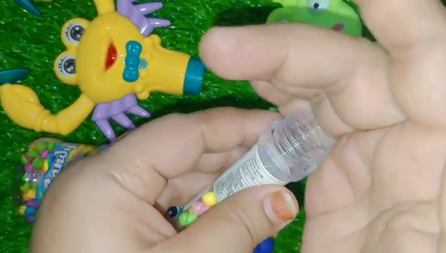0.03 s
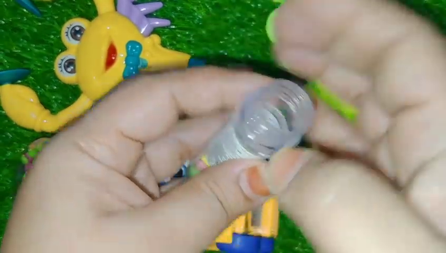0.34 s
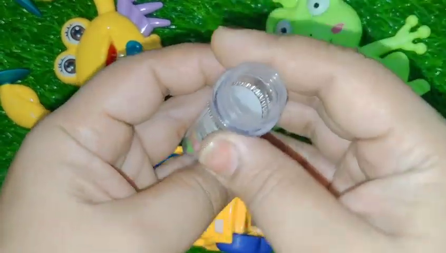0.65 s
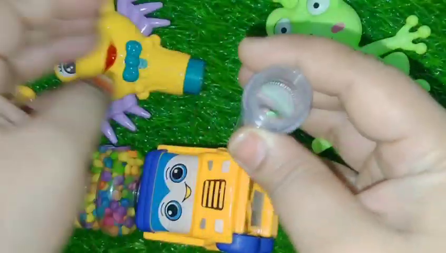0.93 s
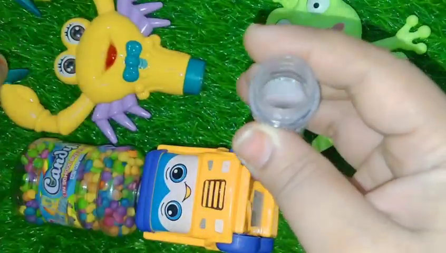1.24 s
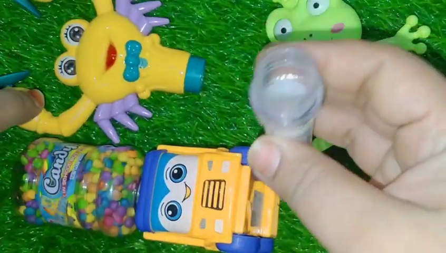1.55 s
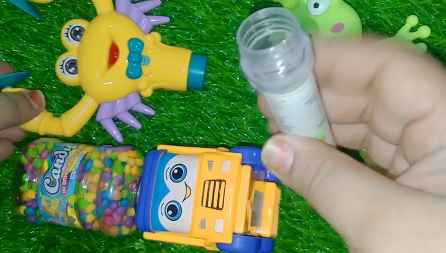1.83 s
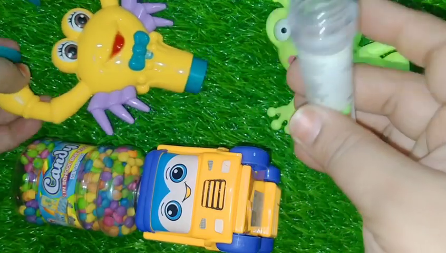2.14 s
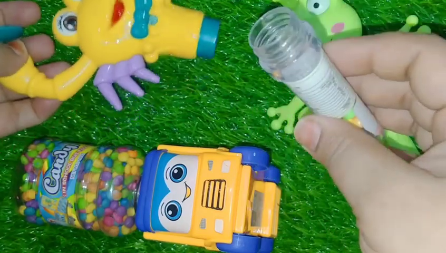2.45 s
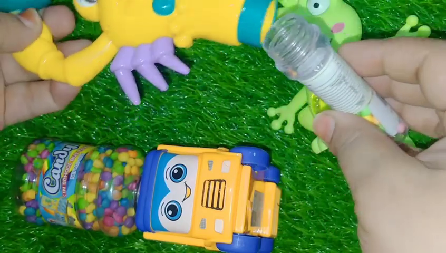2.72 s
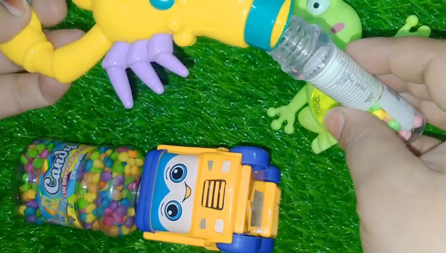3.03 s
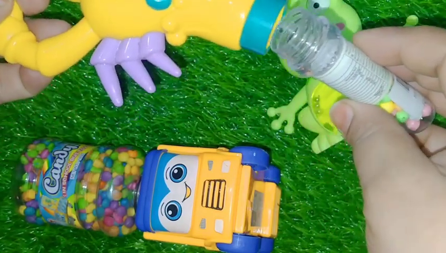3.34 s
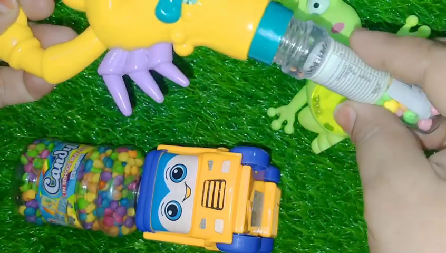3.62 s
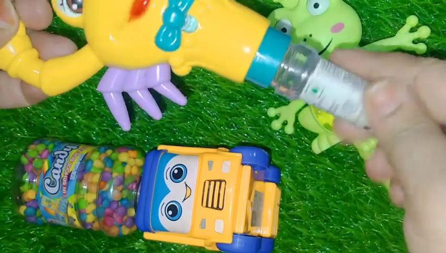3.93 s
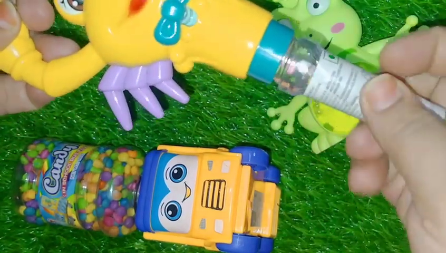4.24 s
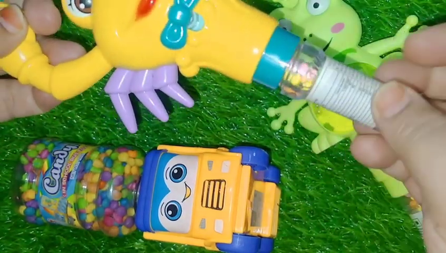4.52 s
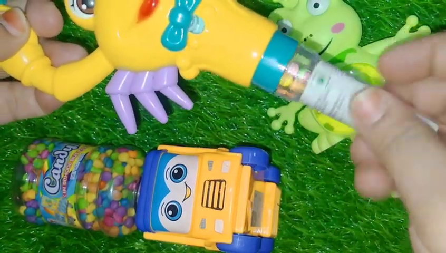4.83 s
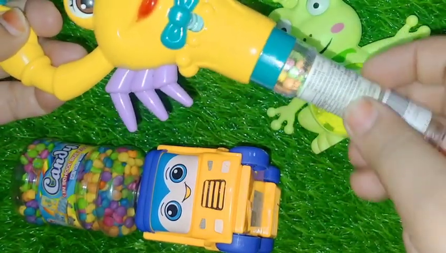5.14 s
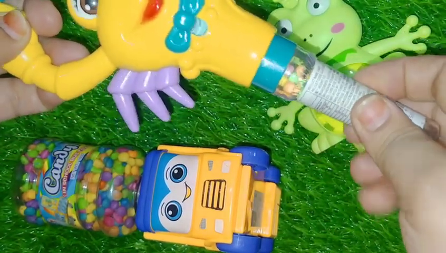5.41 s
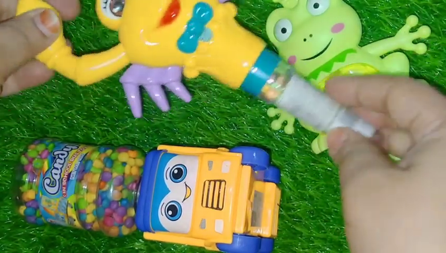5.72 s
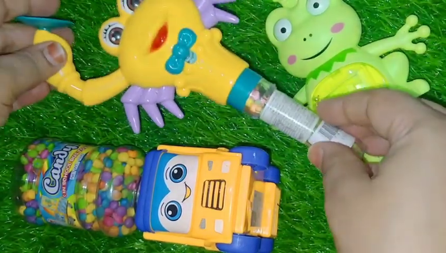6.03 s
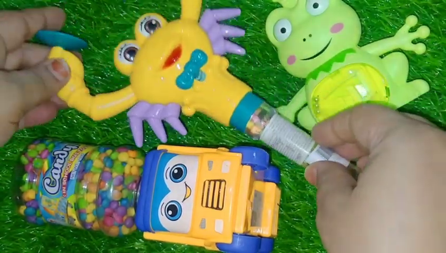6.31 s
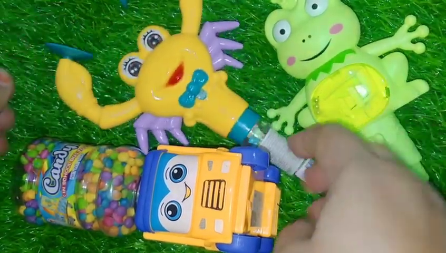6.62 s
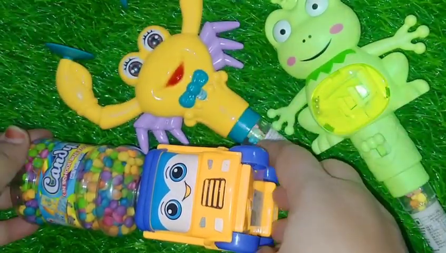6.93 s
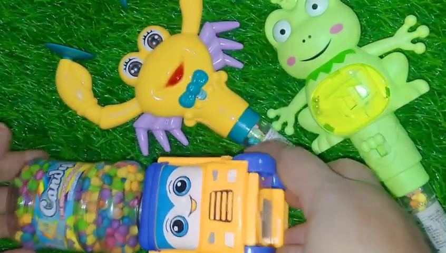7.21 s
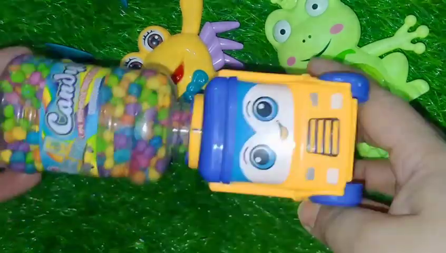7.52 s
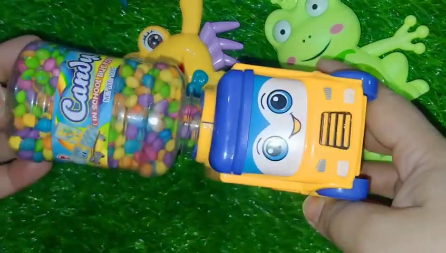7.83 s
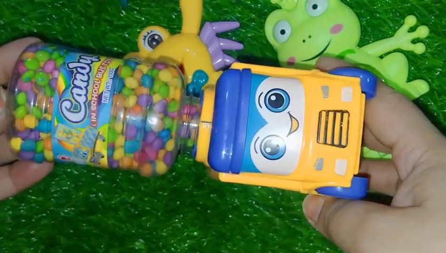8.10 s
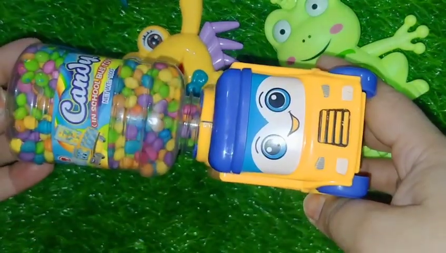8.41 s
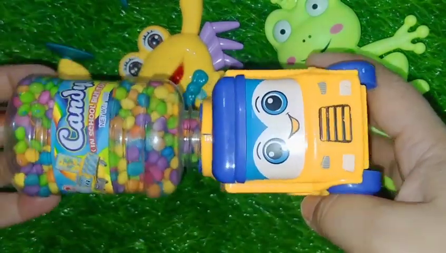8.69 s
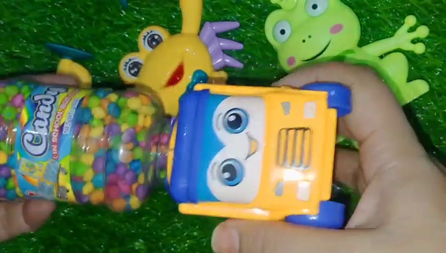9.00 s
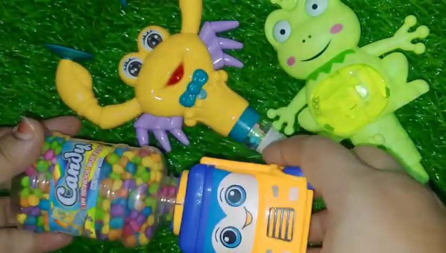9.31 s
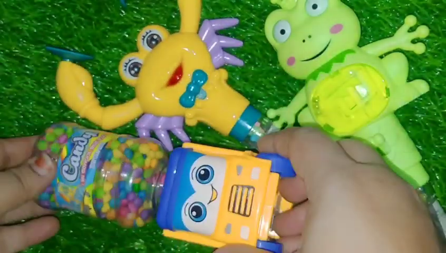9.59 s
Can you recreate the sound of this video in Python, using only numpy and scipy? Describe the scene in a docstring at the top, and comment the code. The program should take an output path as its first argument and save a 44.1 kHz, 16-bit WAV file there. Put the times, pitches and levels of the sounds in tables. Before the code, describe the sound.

Small hard candies rattle in a plastic tube and trickle into a hollow toy, with light plastic knocks and clicks close by.

```python
"""Small hard candies tick in a plastic tube, then run into a hollow toy crab, whose air space and neck ring.
Each tick is a flurry of tiny contacts, coloured by the plastic it strikes. The crab is knocked and
put down; a toy truck with a bottle of candies snaps under the fingers and is set down too.
Each load hops and settles. Fingers rub, an arm sweeps past; all is close, in a bare, ringing room
with a fan turning."""
import sys
import numpy as np
from scipy import signal
from scipy.fft import rfft, irfft
from scipy.io import wavfile
from scipy.ndimage import uniform_filter1d

SR = 44100
rng = np.random.default_rng(int(sys.argv[2]) if len(sys.argv) > 2 else 0)


def dump_mix(stems):
    """Bounce the given channels to the path in sys.argv[1] as a 16-bit WAV at rate SR."""
    frames = np.atleast_2d(stems).T  # one column per channel
    limited = np.clip(frames, -1, 1)  # hard clip at full scale
    pcm = np.round(limited * 32767).astype(np.int16)
    wavfile.write(sys.argv[1], SR, pcm)


N = 429975
LEAD_S = .003  # silence ahead of each flurry


def amp(db):
    """Decibels to gain."""
    return 10 ** (np.asarray(db) / 20)


def unit_rms(x):
    """Scales to rms 1."""
    return x / np.sqrt(np.mean(x ** 2) + 1e-20)


def at_level(x, db, size=176):
    """Scales the loudest 4 ms to db rms."""
    return x * amp(db) / np.sqrt(uniform_filter1d(x ** 2, size, mode="constant").max() + 1e-20)


def log_interp(points, hz):
    """Interpolates over log frequency."""
    f, value = np.transpose(points)
    return np.interp(np.log(hz + 1), np.log(f), value)


def bandpass(x, low_hz, high_hz):
    """Butterworth band-pass."""
    return signal.sosfilt(signal.butter(2, [low_hz, high_hz], "band", fs=SR, output="sos"), x)


def add(mix, s, sound):
    """Mixes a sound in at time s."""
    part = mix[max(round(s * SR), 0):][:len(sound)]
    part += sound[:len(part)]


def drift(max_hz, size=8192):
    """Slow noise, rms 1."""
    passband = np.fft.rfftfreq(size, N / SR / size) < max_hz
    slow = irfft(rfft(rng.standard_normal(size)) * passband)
    return np.interp(np.arange(N), np.linspace(0, N, size), unit_rms(slow))


def envelope(length_s, attack_s, release_s):
    """Trapezoid; the release starts at length_s."""
    t = np.arange(0, length_s + release_s, 1 / SR)
    return np.clip(np.minimum(t / attack_s, (length_s + release_s - t) / release_s), 0, 1)


def body(colour, peaks=(), size=4096):
    """Minimum-phase response, energy 1: resonances on a broad colour."""
    hz = abs(np.fft.fftfreq(size, 1 / SR))
    lift = 1 + sum(amp(db) / (1 + (2 * (hz - f) / width) ** 2) for f, width, db in peaks)
    log_gain = np.log(amp(log_interp(colour, hz)) * lift)
    response = np.fft.ifft(np.exp(np.conj(signal.hilbert(log_gain)))).real[:size // 2]
    return response / np.linalg.norm(response)


def ring(modes, size=4096):
    """Damped modes after one blow; neighbours swing in opposite directions."""
    t = np.arange(size) / SR
    grip_detune = 1 + .012 * rng.standard_normal(len(modes))
    return sum((-1) ** k * amp(db) * 10 ** (-3 * t / t60) * np.sin(2 * np.pi * hz * grip_detune[k] * t)
               for k, (hz, db, t60) in enumerate(modes))


def flurry(decay_ms, spike_db=3, size=2048):
    """One impact as many tiny, unequal contacts, whitened to excite all pitches alike."""
    age = np.maximum(np.arange(size) / SR - LEAD_S, 0) / (max(decay_ms, .4) / 1000)
    contacts, heights = rng.standard_normal((2, size))
    spiky = contacts * amp(spike_db * np.clip(heights, -2, 2))
    spectrum = rfft(spiky * (1 - np.exp(-1.3 * age)) * np.exp(-age))
    return irfft(spectrum / np.sqrt(abs(spectrum) + 1e-12), size)


def crack(decay_ms, db, low_hz=800, high_hz=3600):
    """Two plastic parts meet: a short, dull flurry."""
    return at_level(bandpass(flurry(decay_ms), low_hz, high_hz), db)


def strike(s, db, max_touch_s=.006, max_rebound_s=.016):
    """Light touch, blow and rebound, unevenly spaced: (time [s], level [dB])."""
    before, after = rng.uniform(.4, 1, 2)
    return [(s - max_touch_s * before, db - 10.5), (s, db), (s + max_rebound_s * after, db - 13)]


def ticks(strikes, response, flurry_ms):
    """Candy strikes heard through the plastic; weak contacts slide for longer."""
    out = np.zeros(N)
    for row in strikes:
        for s, db in strike(*row):
            graze = 1 + .02 * np.clip(-36 - db, 0, 20)
            tick = signal.fftconvolve(flurry(flurry_ms * graze), response)
            add(out, s - LEAD_S, at_level(tick, db))
    return out


def tumble(bouts, response, rate_hz, spread_db, sag_db_per_s=21.5, voices=8):
    """Sliding candies: weak random contacts, fading as they come to rest."""
    out = np.zeros(N)
    for s, length_s, db in bouts:
        shape = envelope(length_s, attack_s=.004, release_s=.02)
        n = len(shape)
        sizes = amp(spread_db * np.minimum(rng.exponential(1, SR)[:n], 3))
        grains = np.zeros(n)
        for _ in range(voices):
            hits = rng.random(SR)[:n] < rate_hz / voices / SR
            grains += signal.fftconvolve(sizes * hits, flurry(.94))[:n]
        sag = amp(db - sag_db_per_s * np.arange(n) / SR)
        add(out, s, signal.fftconvolve(unit_rms(grains) * shape * sag, response))
    return out


def landing(s, db, settle_s, response, flurry_ms, settle_db, hop_s=.031, hop_ratio=.9, loss_db=7.5):
    """A load of candies lands, hops lower and quicker, and tumbles to rest."""
    hop = np.arange(3)
    times = s + hop_s * (np.cumsum(hop_ratio ** hop) - 1) / hop_ratio
    hops = ticks(zip(times, db - loss_db * hop), response, flurry_ms)
    return hops + tumble([(s, settle_s, db + settle_db)], response, rate_hz=300, spread_db=4.5)


def blows(hits, modes, crack_db):
    """Stiff plastic struck: a crack, and modes tilted by the hardness of the contact."""
    out = np.zeros(N)
    for s, db, tilt in hits:
        tilted = [(hz, gain + tilt * np.log2(hz / modes[0][0]), t60) for hz, gain, t60 in modes]
        add(out, s, at_level(ring(tilted), db))
        add(out, s - LEAD_S, crack(1.5, db + crack_db))
    return out


# room decay: (frequency [Hz], t60 [s])
ROOM_T60 = [(300, 0.7), (1200, 0.59), (3000, .68), (6000, 0.56), (10000, 0.51), (15000, 0.32)]


def reflections(build_s=.0044):
    """Dense echoes build up; each band decays at its own rate."""
    taps = rng.choice([-1., 1.], SR) * (rng.random(SR) < .25)
    hz, t, bands = signal.stft(taps, SR, nperseg=256)
    decay = amp(-60 * t / log_interp(ROOM_T60, hz)[:, None])
    tail = signal.istft(bands * decay, SR, nperseg=256)[1]
    tail *= 1 - np.exp(-(np.arange(len(tail)) / SR / build_s) ** 2)
    return tail / np.linalg.norm(tail)


def room(x, patterns=3, crossfade_hz=6):
    """The toys move about, so the echo pattern keeps changing."""
    phase = 2 * np.pi * crossfade_hz * np.arange(N) / SR
    shares = [np.cos(phase + np.pi * k / patterns) * np.sqrt(2 / patterns) for k in range(patterns)]
    return sum(signal.fftconvolve(x * share, reflections())[:N] for share in shares)


# air noise: (frequency [Hz], relative density [dB])
AIR_COLOUR = [(35, -20.5), (72, -13.5), (90, -4), (167, -5.5), (192, -3), (226, -12), (298, -6.5),
              (343, -13.5), (464, -11.5), (850, -7.5), (1150, -9.5), (2410, -18), (5840, -35.5),
              (8470, -38.5), (15500, -40)]
# fan flutter and hum: (frequency [Hz], level [dB])
FAN_LINES = [(18.4, -59), (57, -83.5), (92, -78.5), (200, -78), (293, -80)]


def fan(air_db=-61, waver_rad=.57):
    """A soft, fluttering rush of air and wavering hum lines."""
    t = np.arange(N) / SR
    colour = amp(log_interp(AIR_COLOUR, np.fft.rfftfreq(N, 1 / SR)))
    rush = unit_rms(irfft(rfft(rng.standard_normal(N)) * colour, N))
    hum = sum(amp(db) * np.sqrt(2) * np.sin(2 * np.pi * hz * t + waver_rad * drift(4))
              for hz, db in FAN_LINES)
    return rush * amp(air_db + .75 * drift(7.4)) + hum


# closest passes of an arm: (time [s], level [dB])
ARM_PASSES = [(0.05, -65.5), (2.1, -62.5), (4.4, -69), (5.1, -62.5), (9.55, -64.5)]


def arm(fade_s=.42):
    """A rumble swells and fades as an arm passes."""
    t = np.arange(N) / SR
    rumble = unit_rms(bandpass(rng.standard_normal(N), low_hz=50, high_hz=220))
    return rumble * sum(amp(db) * np.exp(-((t - s) / fade_s) ** 2) for s, db in ARM_PASSES)


# finger strokes: (start [s], length [s], relative level [dB])
STROKES = [(1.094, 1.35, -62), (3.654, 1.63, -59.5), (5.6, 0.22, -69.5), (6.149, .35, -65.5),
           (7.097, 0.24, -63), (7.4, 0.39, -70), (9.05, .8, -58.5)]
# rub spectrum: (frequency [Hz], gain [dB])
RUB_COLOUR = [(300, -6), (900, -1.5), (1700, 2.5), (3400, -6.5), (4400, -6.5), (5500, -21), (8400, -15),
              (10500, -27.5), (15000, -13)]


def fingers(uneven_db=3, gain_db=-4):
    """Skin sticks and slips on plastic: a faint, uneven rustle."""
    slips = unit_rms(rng.standard_normal(N) * amp(uneven_db * drift(70)))
    pressure = np.zeros(N)
    for s, length_s, db in STROKES:
        add(pressure, s, amp(db + gain_db) * envelope(length_s, attack_s=.11, release_s=.29))
    return signal.oaconvolve(slips * pressure, body(RUB_COLOUR))[:N]


# plastic snaps: (time [s], level [dB], tilt [dB/octave])
SNAPS = [(1.494, -47.5, 11), (8.695, -59.5, 3), (8.723, -51.5, -1), (8.8152, -42, 7)]
# snap modes: (frequency [Hz], gain [dB], t60 [s])
SNAP_MODES = [(1650, 7, 0.015), (1960, 5.5, 0.037), (2220, 13, 0.0037), (3000, -1.5, 0.012),
              (3580, -2.5, 0.013), (4150, -1, 0.0071), (5930, -15, 0.0045), (7200, -18.5, 0.0076)]


def snaps():
    """Stiff plastic snaps under the fingers."""
    return blows(SNAPS, SNAP_MODES, crack_db=-9)


# toy bumps: (time [s], level [dB], tilt [dB/octave])
BUMPS = [(3.571, -41, -4), (6.19, -59, -2.5), (6.543, -31.5, 6.5), (6.547, -30, -7), (7.101, -54.5, -5.5),
         (7.29, -55.5, -5), (9.372, -35.5, -10.5), (9.379, -42, -9), (9.460, -46, -5), (9.584, -50.5, -7.5),
         (9.657, -49.5, -6)]
# toy modes: (frequency [Hz], gain [dB], t60 [s])
BUMP_MODES = [(757, -7.5, 0.014), (1110, -1.5, 0.014), (1248, -4.5, 0.087), (1580, 7.5, 0.013),
              (1670, 5, 0.022), (1925, -0.5, .02), (2624, 3.5, 0.017), (3160, 0, .02), (3490, -14.5, .025),
              (4300, -4, 0.018)]


def bumps():
    """Toys bump the mat, the hand and each other."""
    return blows(BUMPS, BUMP_MODES, crack_db=-9.5)


# knocks on the crab: (time [s], relative level [dB], hardness [dB])
CRAB_KNOCKS = [(0.08, -44, -8), (3.078, -35, -15), (3.569, -29.5, -14), (3.807, -42, -12),
               (4.077, -42, -16), (4.251, -44.5, -24), (4.336, -27, -32), (4.386, -35.5, 4),
               (4.67, -35, -5), (4.716, -38.5, 4), (4.802, -41, -19), (4.951, -27.5, -14.5),
               (4.989, -25, -4)]
# two air modes, then shell modes: (frequency [Hz], gain [dB], t60 [s])
CRAB_MODES = [(1110, 1, 0.027), (1242, 2, 0.052), (800, -22, 0.019), (1470, -4, 0.018), (1920, -1, 0.011),
              (2220, 1, 0.026), (2684, -8, 0.059)]


def crab_knocks(soft_db=-17.5, soft_edge_hz=1435, edge_hz_per_db=49):
    """The air space rings; harder blows bring out the shell and a brighter crack."""
    out = np.zeros(N)
    air = list(CRAB_MODES[:2])
    for knock_s, knock_db, hard_db in CRAB_KNOCKS:
        shell = [(hz, db + hard_db + 4, t60) for hz, db, t60 in CRAB_MODES[2:]]
        add(out, knock_s, at_level(ring(air + shell), knock_db - 7))
        edge_hz = soft_edge_hz + edge_hz_per_db * max(hard_db - soft_db, 0)
        for s, db in strike(knock_s, knock_db - 10):
            add(out, s - LEAD_S, crack(3, db, low_hz=997, high_hz=edge_hz))
    return out


# bottle contact spectrum: (frequency [Hz], gain [dB])
BOTTLE_COLOUR = [(300, -45), (1400, 2), (3500, -7), (5800, -1), (8800, 0.5), (10500, -1.5), (14500, 2)]
# bottle resonances: (frequency [Hz], width [Hz], gain [dB])
BOTTLE_PEAKS = [(4500, 200, 0), (5600, 120, 4)]


def candies_in_truck():
    """The truck is set down; its load lands in the bottle."""
    bottle = body(BOTTLE_COLOUR, BOTTLE_PEAKS)
    return landing(s=9.38, db=-35.5, settle_s=.08, response=bottle, flurry_ms=4.5, settle_db=-20.5)


# belly contact spectrum: (frequency [Hz], gain [dB])
BELLY_COLOUR = [(300, -35), (1200, -10), (2500, -8.5), (3400, -9.5), (5000, -7), (7500, -5.5), (9000, -3),
                (10200, -7.5), (12500, -2.5), (14700, 0.5), (16000, -4)]
# belly air resonances: (frequency [Hz], width [Hz], gain [dB])
BELLY_PEAKS = [(1200, 90, 3), (4500, 170, 5), (5600, 90, 8), (6450, 160, 0), (8720, 200, -3)]
# jogged candies: (time [s], level [dB])
BELLY_TICKS = [(6.509, -47.5), (6.5436, -33.5)]


def candies_in_crab():
    """The crab is put down: single candies are jogged, then the load lands in its belly."""
    belly = body(BELLY_COLOUR, BELLY_PEAKS)
    jogs = ticks(BELLY_TICKS, belly, flurry_ms=1.9)
    load = landing(s=6.5605, db=-21.5, settle_s=.15, response=belly, flurry_ms=2.7, settle_db=-18.5)
    return jogs + load


# neck contact spectrum: (frequency [Hz], gain [dB])
NECK_COLOUR = [(300, -21.5), (1200, -6.5), (2200, -9), (3400, -11), (5200, -6.5), (6800, -6.5),
               (9000, -3.5), (11200, -5.5), (12500, -2.5), (13600, -5), (15200, 2)]
# air resonances, hollow first: (frequency [Hz], width [Hz], gain [dB])
NECK_PEAKS = [(1248, 57, 10), (5300, 430, -3.5), (2100, 180, -6)]
# spurts into the crab: (start [s], length [s], relative level [dB])
NECK_SPURTS = [(4.02, 0.35, -43), (4.36, 0.12, -41.5), (4.66, 0.16, -44.5), (4.925, .24, -43)]
# strikes at the neck: (time [s], level [dB], neck ring gain [dB])
NECK_TICKS = [(3.041, -58.5, -4), (3.079, -44, -8), (3.474, -60.5, 2), (3.569, -47.5, -4),
              (3.933, -55.5, 10), (4.019, -34.5, 6), (4.1, -40, 2), (4.251, -35, 14.5), (4.282, -42, 6),
              (4.374, -36, 10), (4.397, -34.5, -5), (4.414, -33, -12), (4.518, -38.5, -13),
              (4.6273, -41.5, -20), (4.650, -34.5, -13), (4.661, -31, -10), (4.701, -37.5, -11),
              (4.802, -32.5, -22), (4.936, -31, -12), (5.006, -35, -13), (5.087, -46, -1),
              (5.597, -60.5, 7), (5.673, -55.5, 7), (6.142, -66, 9.5)]


def candies_through_neck(ring_hz=8280, ring_width_hz=520, clink_width_hz=300, clink_db=3, boost_db=5):
    """Candies run into the crab, whose air space hums; some ring the neck, each has its own clink."""
    peaks = list(NECK_PEAKS)
    hollow_hz, hollow_width_hz, _ = peaks[0]
    inside = body(NECK_COLOUR, peaks + [(hollow_hz, hollow_width_hz, boost_db)])
    out = amp(-4) * tumble(NECK_SPURTS, inside, rate_hz=220, spread_db=5.5)
    for s, db, ring_db in NECK_TICKS:
        neck_ring = (ring_hz, ring_width_hz, ring_db)
        clink = (rng.uniform(4550, 14800), clink_width_hz, clink_db)
        out += ticks([(s, db)], body(NECK_COLOUR, peaks + [neck_ring, clink]), flurry_ms=2.2)
    return out


# tube contact spectrum: (frequency [Hz], gain [dB])
TUBE_COLOUR = [(300, -41), (1200, -14), (2000, -21.5), (3500, -18.5), (4500, -13.5), (7200, -11.5),
               (9000, -9), (10500, -8.5), (13300, -4.5), (14700, -0.5), (16000, 1.5)]
# tube air resonances: (frequency [Hz], width [Hz], gain [dB])
TUBE_PEAKS = [(1230, 90, 2), (4650, 550, -1.5), (9200, 450, -3)]
# shakes of the tube: (start [s], length [s], relative level [dB])
TUBE_SHAKES = [(0.015, 0.15, -50), (.885, 0.17, -45.5), (1.15, .27, -48.5), (1.95, .25, -63)]
# strikes on the tube: (time [s], level [dB])
TUBE_TICKS = [(0.0135, -32.5), (0.0802, -35), (0.1416, -40.5), (0.839, -39.5), (0.853, -36), (0.8807, -33),
              (0.8906, -33), (0.9651, -33.5), (1.0824, -38), (1.1483, -33), (1.2114, -32), (1.2423, -35.5),
              (1.3675, -33.5), (1.430, -32), (1.5783, -39), (1.7768, -31.5), (2.0303, -48), (2.125, -40.5),
              (2.156, -43.5), (2.292, -43)]


def candies_in_tube():
    """Candies strike the open, hand-held tube and tumble when it is shaken."""
    tube = body(TUBE_COLOUR, TUBE_PEAKS)
    strikes = ticks(TUBE_TICKS, tube, flurry_ms=1.45)
    return strikes + amp(1) * tumble(TUBE_SHAKES, tube, rate_hz=140, spread_db=5)


def scene():
    """Mono mix of direct sound, room and background."""
    # (signal, room send [dB])
    sources = [(candies_in_tube(), -1.5), (candies_through_neck(), 2.5),
               (candies_in_crab(), -.5), (candies_in_truck(), 0),
               (crab_knocks(), -9.5), (bumps(), -6), (snaps(), -4), (fingers(), -4.5)]
    direct = sum(x for x, _ in sources)
    echoes = room(sum(x * amp(send_db) for x, send_db in sources))
    return (direct + echoes + fan() + arm())[None]


def record(dry):
    """Steep low-pass at 15.6 kHz."""
    lowpass = signal.firwin(511, 15600, window=("kaiser", 9), fs=SR)
    return signal.oaconvolve(dry, lowpass[None], "same")


dry = scene()
out = record(dry)
dump_mix(out)
```